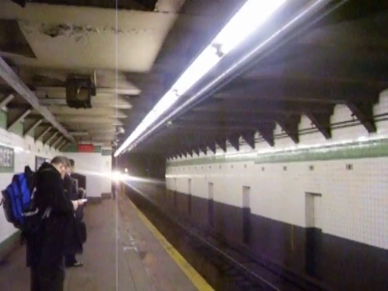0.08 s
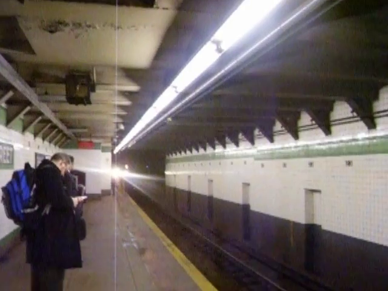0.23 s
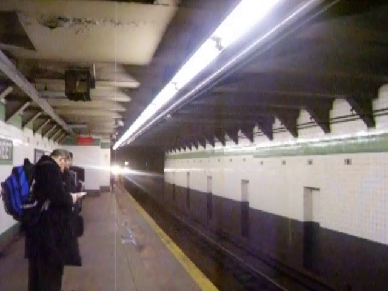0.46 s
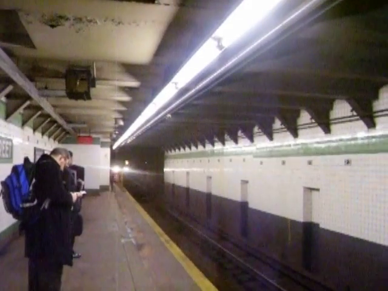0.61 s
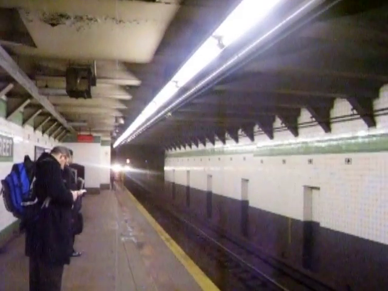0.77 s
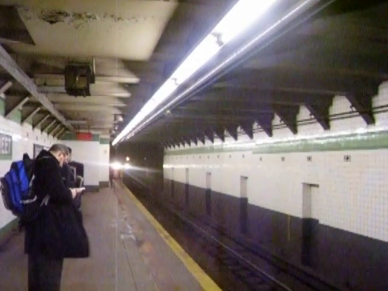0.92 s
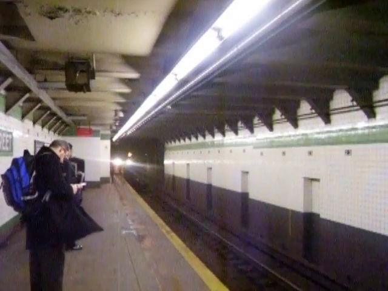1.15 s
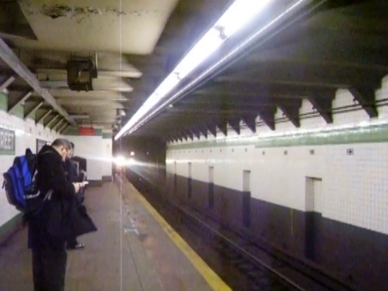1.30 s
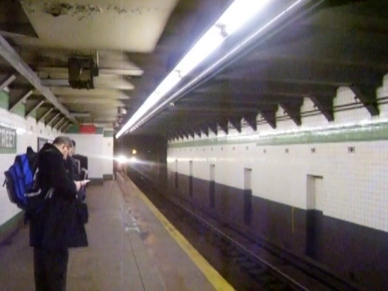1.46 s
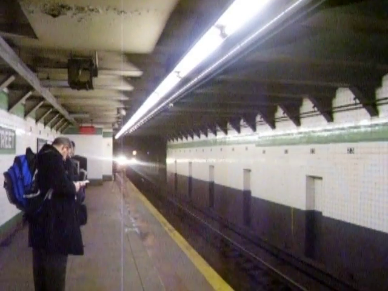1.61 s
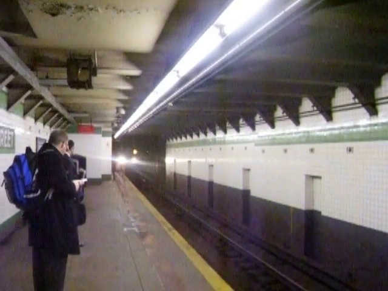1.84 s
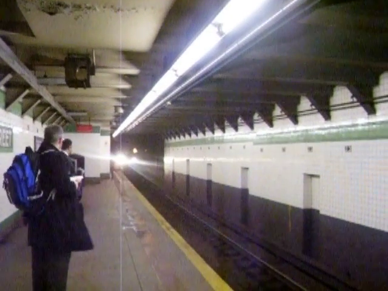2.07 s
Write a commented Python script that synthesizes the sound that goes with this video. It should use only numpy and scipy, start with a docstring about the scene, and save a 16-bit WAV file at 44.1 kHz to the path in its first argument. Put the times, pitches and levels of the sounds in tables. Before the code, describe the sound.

Loud, muffled roar of an approaching underground train, with a thud, crackles and two swells

```python
"""A subway train rolls through the tunnel toward a tiled platform, heard after a brief silence.
The roar, filtered noise and dense rattles, thuds and crackles early on at single strong peaks, then surges.
It drops back with a few more lone crackles, surges a second time and sinks to a steady, lower roar.
A small camera samples it 8000 times a second in 8-bit log steps; peaks over full scale wrap to near zero
and crackle."""
import sys
import numpy as np
from scipy import signal
from scipy.fft import rfft, irfft
from scipy.io import wavfile
from scipy.ndimage import uniform_filter1d

SR = 44100
rng = np.random.default_rng(int(sys.argv[2]) if len(sys.argv) > 2 else 0)


def amplitude_ratio(level_db):
    """Convert a level in decibels to the matching linear amplitude (field) ratio."""
    exponent = np.asarray(level_db, float) / 20
    return 10 ** exponent


def waveform_to_disk(signal):
    """Save audio, clipped to [-1, 1], as 16-bit WAV at the path in sys.argv[1]."""
    frames = np.transpose(np.atleast_2d(signal))
    scaled = np.clip(frames, -1, 1) * 32767
    samples = np.round(scaled).astype(np.int16)
    wavfile.write(sys.argv[1], SR, samples)


N = 91904  # samples

# Course of the roar, treble and bass relative to its middle: time_s, level_db, treble_db, bass_db
ROAR_COURSE = [(0.034, -19, -4, 18.5), (0.052, -20.5, 1.5, 29), (.08, -20.5, -2.5, 2),
               (.13, -21.5, 0.5, 11.5), (.26, -18.5, 2, 11), (.39, -19, 0.5, 9.5), (.425, -16, 3.5, 0),
               (.45, -16, 3.5, -6), (0.476, -15.5, -0.5, 6), (0.486, -18, -3, 7), (0.541, -25.5, 4, 26.5),
               (.543, -11.5, 2.5, 1), (.57, -15.5, -1, 7), (.66, -14, -2, 10.5), (0.709, -13.5, 1, 12.5),
               (0.749, -7.5, 0, -8), (0.818, -7, -2, -0.5), (0.902, -7, -3, -10.5), (0.908, -14, 0, -8.5),
               (1.041, -14, -0.5, -5.5), (1.15, -12.5, -2.5, -3), (1.21, -13.5, -4, -2.5),
               (1.279, -15, -1, 3), (1.32, -11.5, 3.5, -5), (1.362, -8.5, 5.5, -5), (1.5, -6.5, 1.5, -1),
               (1.623, -9.5, 4.5, -2.5), (1.63, -14.5, 5, -7), (1.782, -14.5, 3, -6),
               (1.801, -16.5, -2.5, 0), (1.818, -15, 2, -3), (2.08, -15, -2, -1.5)]
# Spectral density of the roar before the treble and bass tilts: frequency_hz, density_db_per_hz
ROAR_SPECTRUM = [(15, -57.5), (25, -24.5), (60, -16), (110, -12.5), (145, -13), (230, -5.5), (400, -2.5),
                 (520, 0), (750, -2.5), (1020, -3.5), (1250, -15.5), (1450, -16), (2670, -20),
                 (3500, -28.5), (3900, -35), (5070, -61), (8580, -120)]
# Lone strong downward peaks of the roar, high enough to pass full scale and crackle: time_s, peak_db
LONE_PEAKS = [(0.4625, -0.5), (0.471, 0.5), (1.0378, 1), (1.0606, 0), (1.2922, -1.5)]

BASS_HZ, TREBLE_HZ = 140, 1140  # edges of the middle of the roar
SHUDDER_DB, SHUDDER_PER_S = 0.38, 40  # rms level change of all bands together
FLICKER_DB, FLICKER_PER_S = 0.5, 15  # rms level change of each band alone
RATTLES_PER_S, RATTLE_SPREAD_DB = 300, 2.5  # small knocks of wheels and bogies
RATTLE_DB, RATTLE_T60_S = -16.5, 0.03  # level relative to the rolling noise, decay by 60 dB
PEAK_WIDTH_S = 0.00051  # from the peak to the zero crossing
THUD_S, THUD_LENGTH_S = 0.455, 0.035
THUD_HZ, THUD_DB = 295, 7  # the roar deepens for a moment
CAMERA_SR, START_S = 8000, 0.0363  # samples per second, end of the opening silence
FULL_SCALE, CEILING = 0.708, 0.7  # amplitudes


def unit(x):
    """Normalization: a signal divided by its root mean square has rms 1."""
    return x / np.sqrt(np.mean(x ** 2))


def random_levels(rate_per_s):
    """Random modulation: independent held levels, smoothed by two moving averages, rms 1."""
    hold = int(SR / rate_per_s)
    levels = np.repeat(rng.standard_normal(2000), hold)[:N]
    return unit(uniform_filter1d(uniform_filter1d(levels, hold), hold))


def rattles():
    """Impulse response: uneven knocks at random times each excite the same decaying noisy tail."""
    count = int(RATTLES_PER_S * N / SR)
    when = (rng.random(count) * N).astype(int)
    knocks = np.zeros(N)
    knocks[when] = amplitude_ratio(RATTLE_SPREAD_DB * rng.exponential(size=count))
    age_s = np.arange(4096) / SR
    tail = rng.standard_normal(4096) * amplitude_ratio(-60 * age_s / RATTLE_T60_S)
    return unit(signal.fftconvolve(knocks, tail)[:N])


def lone_peaks():
    """Band-limited pulse: each peak is one swing down between two smaller swings up."""
    t = np.arange(N) / SR
    total = np.zeros(N)
    for time_s, peak_db in LONE_PEAKS:
        u = ((t - time_s) / PEAK_WIDTH_S) ** 2
        total -= amplitude_ratio(peak_db) * (1 - u) * np.exp(-u / 2)
    return total


def train():
    """Rolling noise: broadband excitation in third-octave bands that shudder together and flicker alone."""
    t = np.arange(N) / SR
    time_s, *courses = np.array(ROAR_COURSE).T
    level_db, treble_db, bass_db = (np.interp(t, time_s, course) for course in courses)
    colour_hz, colour_db = np.array(ROAR_SPECTRUM).T
    hz = np.maximum(np.arange(N // 2 + 1) * SR / N, 1)

    excitation = rng.standard_normal(N) + amplitude_ratio(RATTLE_DB) * rattles()
    colour = amplitude_ratio(np.interp(np.log(hz), np.log(colour_hz), colour_db))
    spectrum = rfft(unit(irfft(rfft(excitation) * colour, N)))

    thud_distance = ((t - THUD_S) / THUD_LENGTH_S) ** 2
    roar = np.zeros(N)
    for centre_hz in 2 ** np.arange(4, 12.5, 1 / 3):
        # overlapping raised-cosine bands, in all a flat sum
        share = np.cos(np.pi / 2 * np.clip(3 * np.log2(hz / centre_hz), -1, 1)) ** 2
        band_db = treble_db / (1 + (TREBLE_HZ / centre_hz) ** 8)
        band_db = band_db + bass_db / (1 + (centre_hz / BASS_HZ) ** 4)
        band_db = band_db + THUD_DB * np.exp(-thud_distance - np.log2(centre_hz / THUD_HZ) ** 2)
        band_db = band_db + FLICKER_DB * random_levels(FLICKER_PER_S)
        roar += irfft(spectrum * share, N) * amplitude_ratio(band_db)
    return roar * amplitude_ratio(level_db + SHUDDER_DB * random_levels(SHUDDER_PER_S))


def scene():
    """Superposition: the pressures of the roar and its lone peaks add."""
    return (train() + lone_peaks())[None]


def log_steps(x):
    """Logarithmic quantization: 8 segments of 16 steps; just over full scale wraps to the quietest segment."""
    magnitude = np.abs(x) / FULL_SCALE * 8158 + 33
    segment = np.floor(np.log2(magnitude)) - 5
    step = np.floor(magnitude / 2 ** (segment + 1))
    decoded = (step + 0.5) * 2 ** (segment % 8 + 1) - 33
    return np.sign(x) * decoded / 8158 * FULL_SCALE


def top_cut(x):
    """Nothing passes above the cut-off."""
    return signal.sosfilt(signal.butter(12, 15800, fs=SR, output="sos"), x)


def record(dry):
    """Sampling: a low rate limits the band, log steps add noise, a hard ceiling clips."""
    up, down = 80, 441  # ratio of CAMERA_SR to SR
    slow = log_steps(signal.resample_poly(dry, up, down, axis=1))
    slow = slow * (np.arange(slow.shape[1]) >= START_S * CAMERA_SR)
    smooth = signal.firwin(32 * down + 1, 1 / down, window=("kaiser", 9.0))  # low-pass at CAMERA_SR / 2
    fast = signal.resample_poly(slow, down, up, axis=1, window=smooth)[:, :N]
    return top_cut(np.clip(fast, -CEILING, CEILING))


dry = scene()
out = record(dry)
waveform_to_disk(out)
```